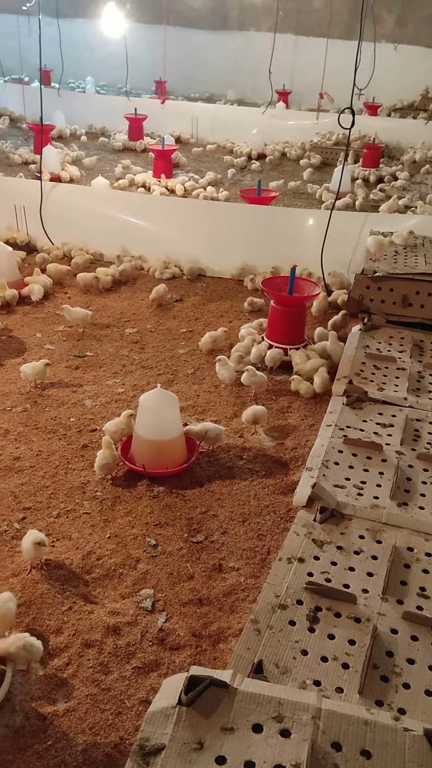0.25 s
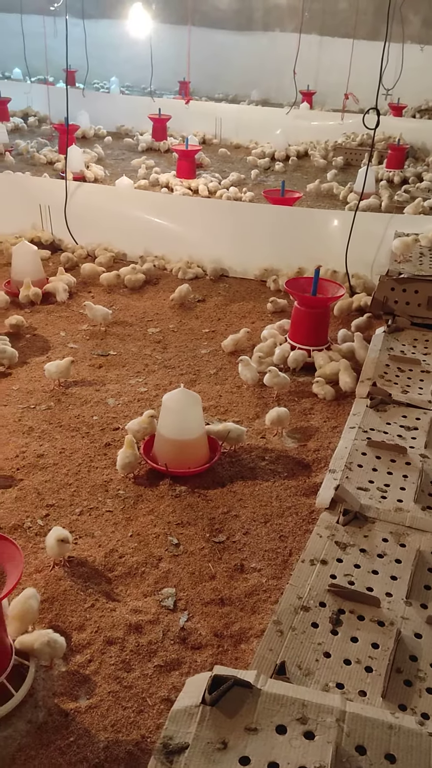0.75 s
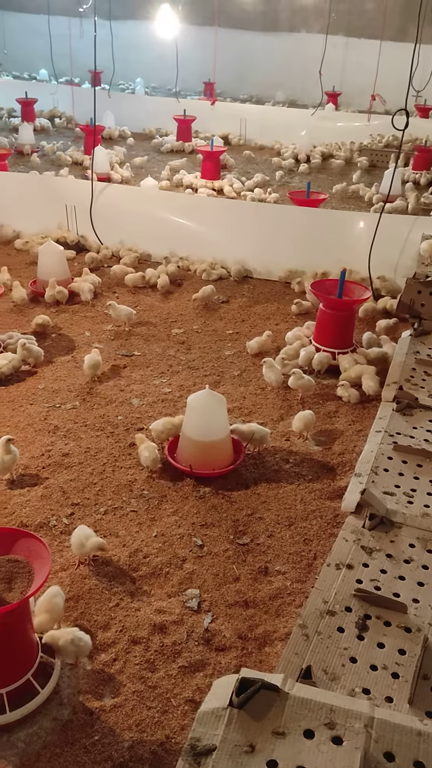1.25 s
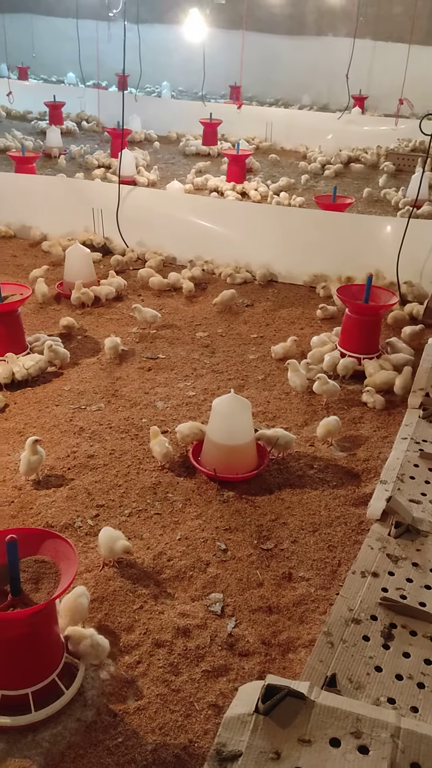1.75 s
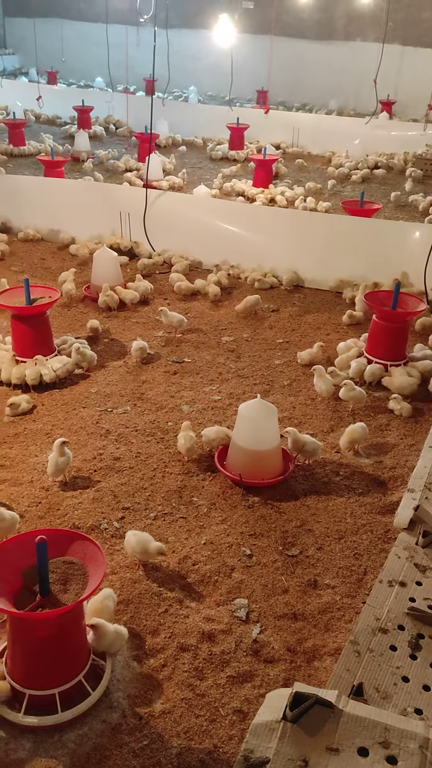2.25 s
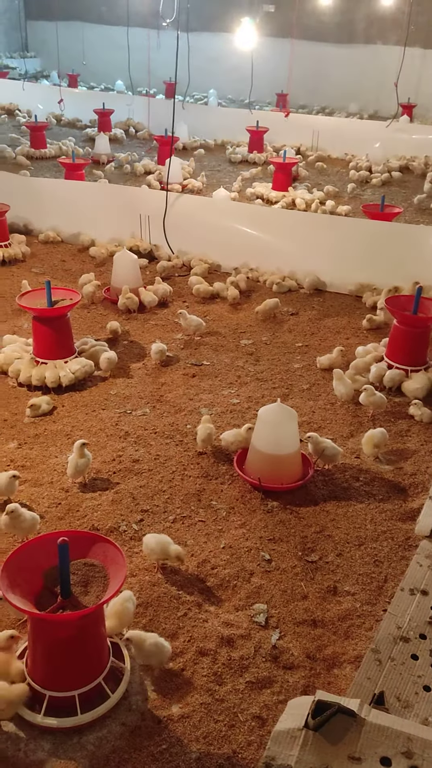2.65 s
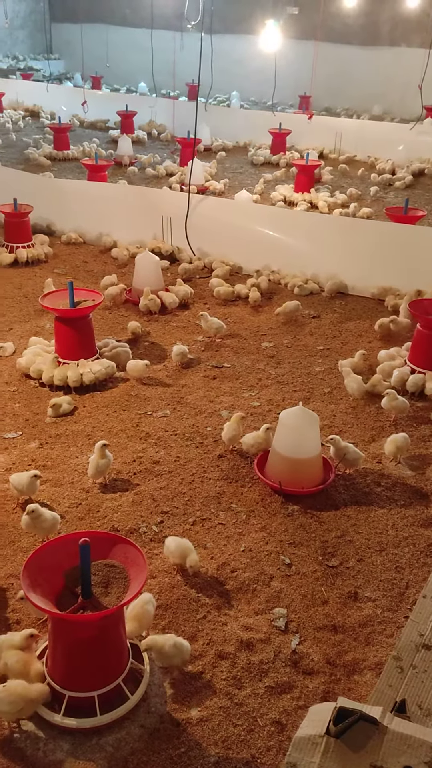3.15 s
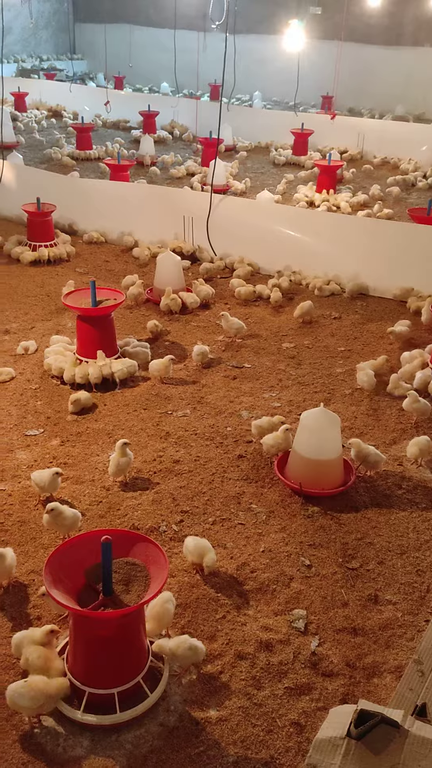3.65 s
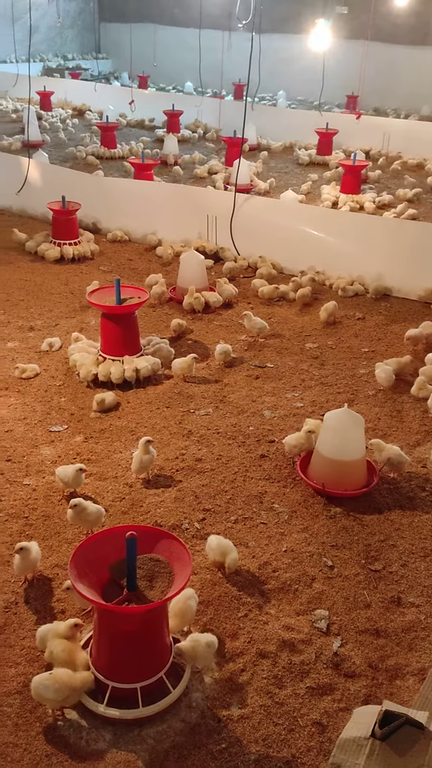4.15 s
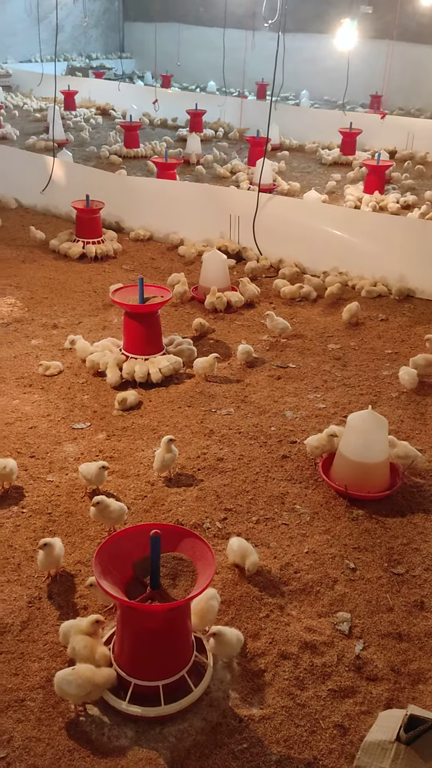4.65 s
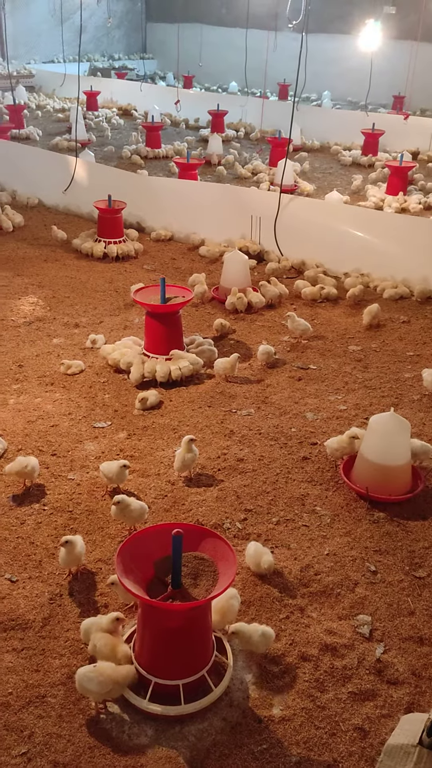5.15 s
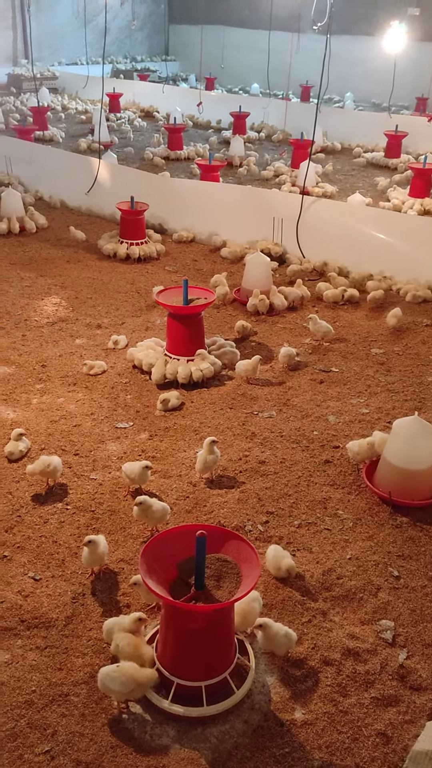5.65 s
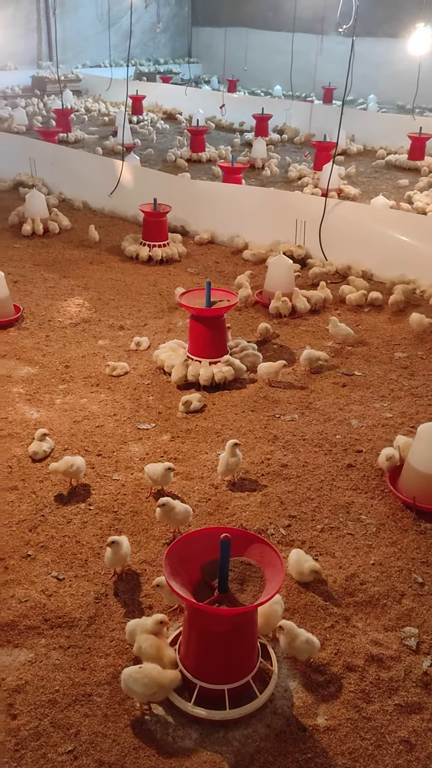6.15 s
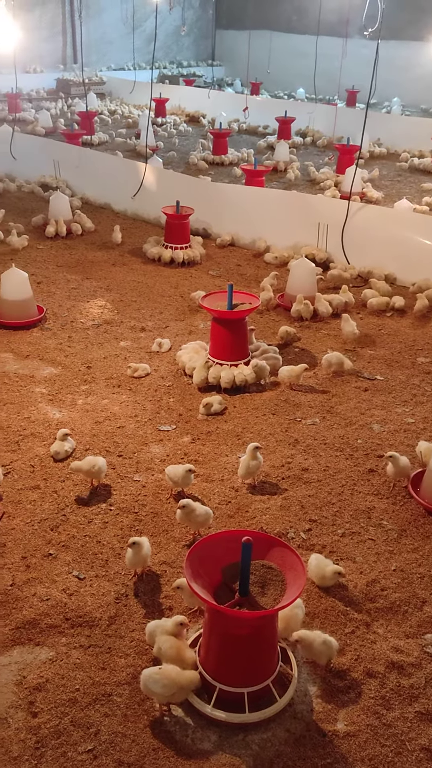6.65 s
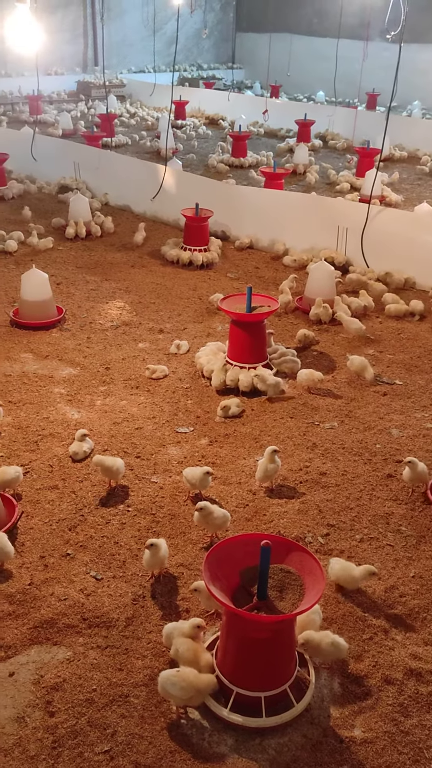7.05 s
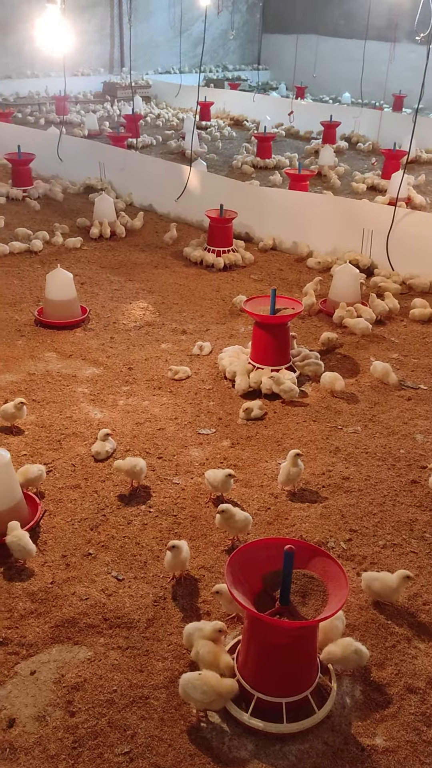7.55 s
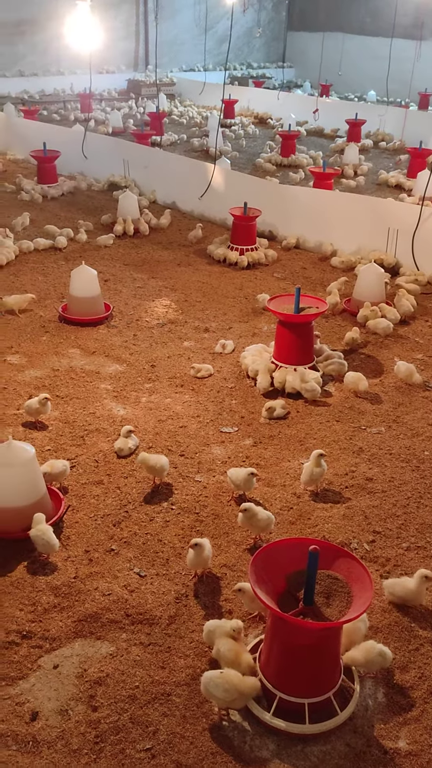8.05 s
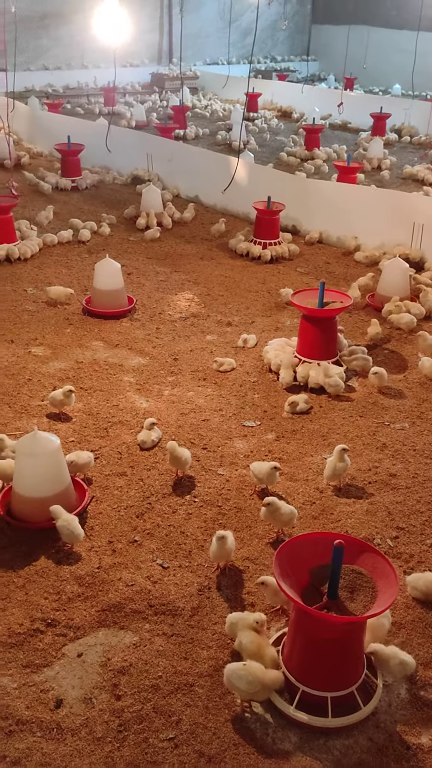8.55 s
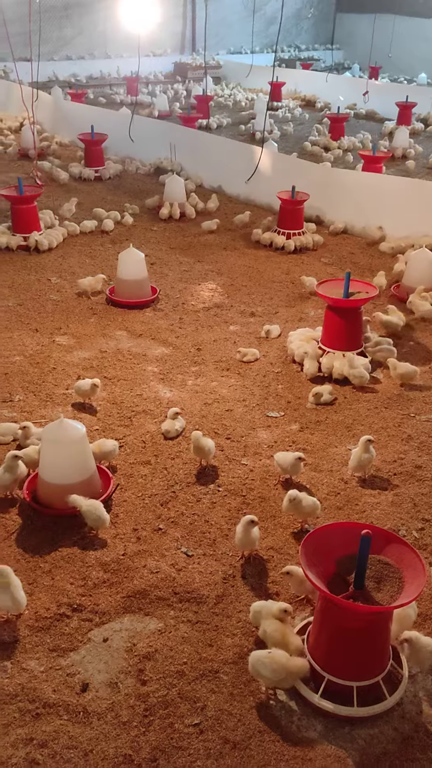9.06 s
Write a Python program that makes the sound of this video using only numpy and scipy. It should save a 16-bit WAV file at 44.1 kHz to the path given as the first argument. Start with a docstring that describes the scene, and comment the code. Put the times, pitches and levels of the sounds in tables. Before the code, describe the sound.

A few young chicks close by give loud, high, falling peeps that ring briefly in a large shed. Behind them, hundreds of distant chicks blur into a constant chorus over steady ventilation noise and a low fan hum. Feet scratch faintly in the shavings, and from just after the start beaks knock softly on hollow plastic feeders here and there. The microphone is held above the litter.

```python
"""Chicks in a large brooder shed, heard by a phone held over the litter. From the start there is a bed of
ventilation noise and low fan hum, with hundreds of far chicks blurred into a chorus and feet scratching
in the shavings. Over it a handful of near birds whistle loud falling peeps that ring in the shed.
A moment in, beaks begin to knock softly on hollow plastic feeders, and go on here and there to the end."""
import sys
import numpy as np
from scipy import signal
from scipy.fft import rfft, irfft
from scipy.io import wavfile
from scipy.ndimage import uniform_filter1d

SR = 44100
rng = np.random.default_rng(int(sys.argv[2]) if len(sys.argv) > 2 else 0)


def log_audio(samples):
    """Write samples as a 16-bit WAV file to the path given in sys.argv[1]."""
    # one column per channel
    frames = np.atleast_2d(samples).T
    # limit to full scale, then quantise
    limited = np.clip(frames, -1, 1)
    pcm = np.round(limited * 32767).astype(np.int16)
    wavfile.write(sys.argv[1], SR, pcm)


N = 410571

# Tone curve of the ventilation: f/Hz, relative spectral level/dB
AIR_SPECTRUM = [(12, -30), (20, 6.5), (40, -2.5), (56, -11), (122, -9.5), (200, -7.5), (397, -13.5),
                (616, -12.5), (1440, -15.5), (2300, -12), (4820, -18.5), (7470, -16), (9560, -26.5),
                (14000, -27)]
# Harmonics 1-4 of a peep at full effort: relative level/dB
HARMONICS_DB = [2.5, -13, -29.5, -35]
# Each bird's voice and place: lead-in above start pitch/Hz, lead-in level/dB, sink of the held part/Hz,
# final fall/Hz, flutter/dB, brightness/dB per overtone, left minus right/dB, direct over echo/dB
VOICES = {"mid": (720, -18.5, 399.5, 813, 2, .6, -0.5, -2),
          "high": (781, -20.5, 400.5, 900, 2.5, -1, -2, -4),
          "low": (650.5, -15, 450.5, 480, 1.8, 0.2, -6, 5),
          "steep": (450, -21.5, 597.5, 653, 1.5, -0.9, -3, -4.5),
          "far": (150.5, -27, 481, 328, 2.6, -7.5, -5, 3)}
# Cues for the near peeps: t/s, bird, held length/s, start f/Hz, level/dB
PEEP_CUES = [(-0.071, "mid", 0.073, 3770, -31.5), (0.284, "mid", 0.062, 3733, -32),
             (0.655, "mid", 0.063, 3695, -33), (0.792, "far", 0.076, 3410, -46),
             (0.938, "high", 0.04, 4130, -40), (0.996, "steep", 0.077, 3800, -33),
             (1.112, "far", 0.046, 3460, -45.5), (1.258, "high", 0.041, 4122, -37),
             (1.517, "high", 0.045, 4190, -36), (1.64, "far", 0.044, 3370, -50),
             (1.822, "high", 0.051, 4180, -35.5), (2.05, "steep", 0.076, 3777, -37),
             (2.151, "high", 0.055, 4190, -37), (2.342, "steep", 0.076, 3742, -32.5),
             (2.365, "high", 0.04, 4400, -41), (2.503, "high", 0.057, 4154, -36),
             (3.252, "far", 0.044, 3185, -42), (3.39, "steep", 0.092, 3798, -33.5),
             (3.608, "far", 0.07, 3430, -39.5), (3.676, "mid", 0.072, 3783, -29.5),
             (3.951, "low", 0.077, 3426, -37), (4.022, "mid", 0.068, 3730, -29.5),
             (4.079, "far", 0.028, 4170, -42), (4.316, "low", 0.071, 3423, -33),
             (4.336, "high", 0.035, 4180, -39.5), (4.538, "mid", 0.059, 3702, -33),
             (4.674, "high", 0.047, 4110, -35.5), (4.732, "low", 0.069, 3437, -34.5),
             (4.946, "high", 0.041, 4130, -36.5), (5.262, "high", 0.049, 4020, -37),
             (5.326, "low", 0.065, 3471, -33.5), (5.585, "high", 0.052, 4066, -36),
             (5.612, "mid", 0.082, 3696, -31), (5.92, "high", 0.054, 4116, -38.5),
             (5.942, "mid", 0.076, 3744, -29.5), (5.994, "high", 0.027, 4290, -45),
             (6.022, "far", 0.044, 3400, -35.5), (6.253, "high", 0.059, 3960, -34.5),
             (6.272, "mid", 0.077, 3787, -31.5), (6.586, "high", 0.06, 4134, -35),
             (6.832, "mid", 0.08, 3777, -32.5), (6.94, "high", 0.061, 4100, -37),
             (7.242, "mid", 0.064, 3728, -32.5), (7.3, "high", 0.042, 4056, -36),
             (8.22, "far", 0.055, 3690, -44), (8.387, "mid", 0.073, 3702, -32.5),
             (8.516, "high", 0.053, 4140, -38), (8.764, "mid", 0.075, 3752, -31),
             (8.806, "high", 0.041, 4180, -36.7), (9.107, "high", 0.048, 4030, -34),
             (9.156, "mid", 0.064, 3720, -31.5)]
# Low, dull beak knocks on the feeders: t/s, level/dB, f/Hz
THUD_CUES = [(0.281, -48, 177), (0.73, -52, 193), (1.613, -49, 193), (2.584, -53, 198), (2.776, -49.5, 206),
             (4.075, -46, 223), (4.435, -54, 170), (5.021, -46, 192), (5.263, -48.5, 232),
             (5.364, -43, 217), (5.499, -50.5, 200), (5.623, -48.5, 221), (5.857, -51, 213),
             (6.291, -49.5, 190), (7.462, -50, 212), (7.754, -45.5, 215), (8.233, -49.5, 160),
             (8.476, -56, 243), (8.594, -49.5, 217), (9.088, -50, 212)]
# Higher, scuffier beak knocks: t/s, level/dB, f/Hz
TAP_CUES = [(0.294, -45, 650), (0.329, -46, 1073), (0.789, -59, 690), (1.597, -48.5, 686),
            (5.854, -55, 624), (5.927, -49.5, 780), (5.959, -58, 890), (6.239, -41, 704),
            (6.376, -49.5, 1026), (7.039, -45.5, 1075)]

AIR_DB, AIR_SWELL_DB, AIR_FLICKER_DB = -53.5, 0.67, 1.72
AIR_CENTRED_HZ, AIR_FROM_LEFT = 428, 0.067  # the noise widens above this pitch and leans slightly left
HUM_HZ, HUM_WIDTH_HZ, HUM_DB = 79.6, 7.5, -68
LEAD_HOLD_S, LEAD_DROP_S, LEAD_SLIDE_HZ = .02, .010, 258.3  # the lead-in slides, then drops into the note
ONSET_DB, ATTACK_S, ATTACK_DB, SWELL_S, FALL_S, FALL_DB = -6, 0.0063, -4.5, 0.02, .027, -14
SAG_AT, SAG_SHARE, WAVER_HZ = 0.2985, .48, 34.95  # the held part sinks fastest at first
OVERTONE_GROWTH = 0.83  # extra dB per dB of effort and per overtone: louder is brighter
CHORUS_PER_S, CHORUS_DB, CHORUS_SPREAD_DB, CHORUS_HZ = 110, -53, 4, 3520
SCRATCH_PER_S, SCRATCH_DB, SCRATCH_SPREAD_DB = 25, -65.5, 2.5
SCRATCH_RISE_S, SCRATCH_DECAY_S = 0.0072, 0.034
EARLY_T60_S, EARLY_FROM_LEFT = 0.11, 0.16
SHED_T60_S, SHED_DB, SHED_DAMP_HZ = 0.47, -5, 6600
MIC_LAG_S, TOP_HZ = 0.0003387, 14150  # sound from the left reaches the right mic this much later


def undb(db):
    return 10 ** (np.asarray(db) / 20)


def level(x, db):
    """Set the RMS level of x."""
    return x * undb(db) / np.sqrt(np.mean(x ** 2))


def add(out, s, x):
    """Mix x into out from time s."""
    i = int(round(s * SR))
    a, b = max(i, 0), min(i + x.shape[-1], N)
    if b > a:
        out[..., a:b] += x[..., a - i:b - i]


def drift(rate):
    """Smooth random modulation: rate steps a second, spread 1."""
    k = int(SR / rate)
    steps = np.repeat(rng.standard_normal(N // k + 1), k)
    smooth = uniform_filter1d(uniform_filter1d(steps, k), k)[:N]
    return smooth / smooth.std()


def ventilation():
    """A bed of rushing air that swells gently while each octave band flickers on its own."""
    hz = np.maximum(np.arange(N // 2 + 1) * SR / N, 1)
    curve_hz, curve_db = np.array(AIR_SPECTRUM).T
    shape = undb(np.interp(np.log(hz), np.log(curve_hz), curve_db))
    centred = 1.01 / (1 + (hz / AIR_CENTRED_HZ) ** 2) / (1 + (45 / hz) ** 2)
    coherence = centred + (1 - centred) * AIR_FROM_LEFT * np.exp(-2j * np.pi * hz * MIC_LAG_S)
    left, unrelated = rfft(rng.standard_normal((2, N)))
    right = coherence * left + np.sqrt(1 - np.minimum(abs(coherence), 1) ** 2) * unrelated
    pair = shape * np.array([left, right])
    out, swell = 0, drift(0.76)
    for octave in range(4, 14):
        band = np.clip(1 - abs(np.log2(hz) - octave - .5), 0, 1)
        out = out + irfft(pair * band, N) * undb(AIR_SWELL_DB * swell + AIR_FLICKER_DB * drift(12))
    return level(out, AIR_DB)


def fan_hum():
    """A low fan tone; narrow noise beats against it so that level and pitch waver."""
    edges = [HUM_HZ - HUM_WIDTH_HZ / 2, HUM_HZ + HUM_WIDTH_HZ / 2]
    noise = signal.sosfilt(signal.butter(2, edges, "band", fs=SR, output="sos"), rng.standard_normal(N))
    tone = np.sin(2 * np.pi * HUM_HZ * np.arange(N) / SR)
    return level(tone + level(noise, -3.0), HUM_DB)


def peep(held_s, start_hz, above_hz, lead_db, sink_hz, fall_hz, waver, flutter_db, bright_db, lag_s=0.):
    """One whistle of the syrinx: a faint high lead-in, a loud sinking note, then a fast fading fall."""
    lead_s, end_s = LEAD_HOLD_S + LEAD_DROP_S, held_s + FALL_S
    lead_hz, knee_hz = start_hz + above_hz, start_hz - sink_hz
    t = np.arange(int((lead_s + end_s + .012) * SR)) / SR - lead_s - lag_s
    pitch_times = [-lead_s, -LEAD_DROP_S, 0, SAG_AT * held_s, held_s, end_s]
    sag_hz = start_hz - SAG_SHARE * sink_hz
    pitches = [lead_hz + LEAD_SLIDE_HZ, lead_hz, start_hz, sag_hz, knee_hz, knee_hz - fall_hz]
    hz = np.interp(t, pitch_times, pitches)
    hz += WAVER_HZ * np.interp(t, np.linspace(0, .12, len(waver)), waver - waver[0])
    hz = uniform_filter1d(hz, size=SR // 120)  # the syrinx rounds its corners
    peak_s = min(SWELL_S, 0.39 * held_s)
    effort_times = [-lead_s, -.75 * lead_s, -LEAD_DROP_S, 0, ATTACK_S, peak_s, held_s, end_s,
                    end_s + 0.0037]
    effort_db = np.interp(t, effort_times,
                          [-60, lead_db, lead_db, ONSET_DB, ATTACK_DB, 0, -1.5, FALL_DB, -60])
    flutter = np.interp(t, np.linspace(0, .12, len(flutter_db)), flutter_db)
    phase = 2 * np.pi * (np.cumsum(hz) / SR - hz[0] * lag_s)
    tone = 0
    for k, harmonic_db in enumerate(HARMONICS_DB):
        db = harmonic_db + flutter + k * bright_db + effort_db * (1 + OVERTONE_GROWTH * k)
        tone = tone + undb(db) * np.sin((k + 1) * phase)
    return np.sqrt(2) * tone


def early_echoes(x):
    """Dense first reflections off floor, feeders and partitions, a new pattern on every call."""
    t = np.arange(SR // 5) / SR
    echo = rng.standard_normal((2, len(t))) * undb(-60 * t / EARLY_T60_S) * (t > .002)
    delayed_left = np.roll(echo[0], int(MIC_LAG_S * SR))
    echo[1] = EARLY_FROM_LEFT * delayed_left + np.sqrt(1 - EARLY_FROM_LEFT ** 2) * echo[1]
    echo /= np.linalg.norm(echo, axis=1, keepdims=True)
    return signal.fftconvolve(x[None], echo, axes=1)


def shed_reverb(x):
    """The duller tail of the whole shed, fully wide."""
    t = np.arange(SR) / SR
    tail = signal.lfilter(*signal.butter(1, SHED_DAMP_HZ, fs=SR), rng.standard_normal((2, SR)))
    tail *= undb(-60 * t / SHED_T60_S) * np.minimum(t / 0.029, 1)
    tail *= undb(SHED_DB) / np.linalg.norm(tail, axis=1, keepdims=True)
    return signal.fftconvolve(x[None], tail, axes=1)[:, :N]


def far_chorus():
    """The far flock: a wash of peeps at random moments and pitches, heard only as echo."""
    flock, span_s = np.zeros(N), N / SR + 1  # with a second of pre-roll
    count = int(CHORUS_PER_S * span_s)
    for when, (pitch, length, loudness) in zip(rng.random(count), rng.standard_normal((count, 3))):
        hz = CHORUS_HZ * (1 + .09 * pitch)
        held_s = .06 * (1 + 0.196 * np.tanh(length))
        call = peep(held_s, hz, above_hz=.15 * hz, lead_db=-7, sink_hz=.12 * hz, fall_hz=0.1586 * hz,
                    waver=np.zeros(2), flutter_db=np.zeros(2), bright_db=-10.0)
        add(flock, when * span_s - 1, undb(CHORUS_SPREAD_DB * loudness) * call)
    return level(shed_reverb(flock) + undb(-10) * early_echoes(flock)[:, :N], CHORUS_DB)


def scratching():
    """Feet in the shavings: short broad bursts of noise at random moments."""
    hits = (rng.random(N) < SCRATCH_PER_S / SR) * undb(SCRATCH_SPREAD_DB * np.tanh(rng.standard_normal(N)))
    softened = uniform_filter1d(hits, int(SCRATCH_RISE_S * SR))
    bursts = signal.lfilter([1], [1, -np.exp(-3 / (SCRATCH_DECAY_S * SR))], softened)
    noise = signal.lfilter(*signal.butter(2, [300, 3000], "band", fs=SR), rng.standard_normal((2, N)))
    return level(bursts * noise, SCRATCH_DB)


def near_chicks():
    """Foreground peeps: each reaches the mics directly, by early echoes and through the shed's tail."""
    out, sends = np.zeros((2, N)), {bird: np.zeros(N) for bird in VOICES}
    wobbles = rng.standard_normal((len(PEEP_CUES), 2, 16))
    for (s, bird, held_s, hz, db), (waver, shake) in zip(PEEP_CUES, wobbles):
        above, lead, sink, fall, flutter, bright, pan_db, direct_db = VOICES[bird]
        direct_share = 1 / (1 + undb(-direct_db) ** 2)  # of the power
        direct, wet = np.sqrt(direct_share), np.sqrt(1 - direct_share)
        begin = s - LEAD_HOLD_S - LEAD_DROP_S
        left, right = (peep(held_s, hz, above, lead, sink, fall, waver, flutter * shake, bright, lag)
                       for lag in (0, MIC_LAG_S))
        sides = undb(db + np.array([[pan_db], [-pan_db]]) / 2)
        add(out, begin, sides * direct * np.array([left, right]))
        add(out, begin, sides * wet * early_echoes(left))
        add(sends[bird], begin, undb(db) * wet * left)
    return out + sum(shed_reverb(send) for send in sends.values())


def feeder_knocks(cues, t60_s, scuff_db):
    """Beaks on hollow plastic: a short ring with a weaker upper mode, and the scuff of the contact."""
    out, t = np.zeros(N), np.arange(SR // 4) / SR
    scuffs = signal.lfilter(*signal.butter(1, 1800, fs=SR), rng.standard_normal((len(cues), len(t))))
    for (s, db, hz), scuff in zip(cues, scuffs):
        ring = np.sin(2 * np.pi * hz * t) + 0.38 * np.sin(2 * np.pi * 1.45 * hz * t)
        envelope = undb(db - 60 * t / t60_s) * np.minimum(t / 0.0047, 1)
        add(out, s, envelope * (ring + undb(scuff_db) * scuff))
    return out + undb(-0.5) * early_echoes(out)[:, :N] + undb(-4.5) * shed_reverb(out)


def scene():
    """The stereo mix: near peeps and knocks over the flock and the fans."""
    thuds = feeder_knocks(THUD_CUES, t60_s=0.081, scuff_db=-7)
    taps = feeder_knocks(TAP_CUES, t60_s=0.055, scuff_db=10)
    return near_chicks() + far_chorus() + thuds + taps + scratching() + ventilation() + fan_hum()


def record(dry):
    """The phone cuts the top treble steeply."""
    return signal.sosfilt(signal.ellip(14, .2, 90, TOP_HZ, fs=SR, output="sos"), dry)


dry = scene()
out = record(dry)
log_audio(out)
```